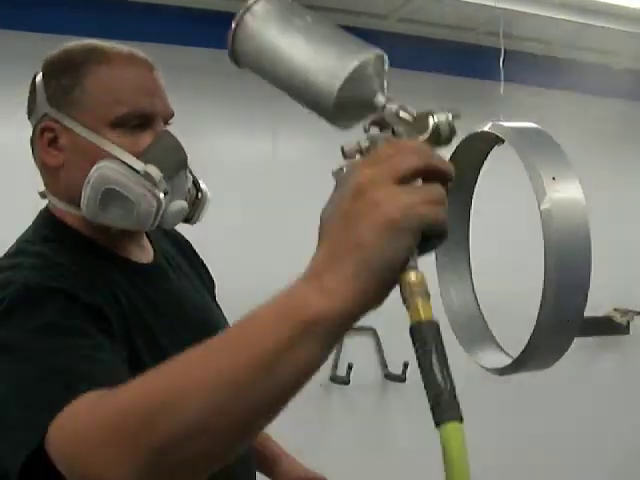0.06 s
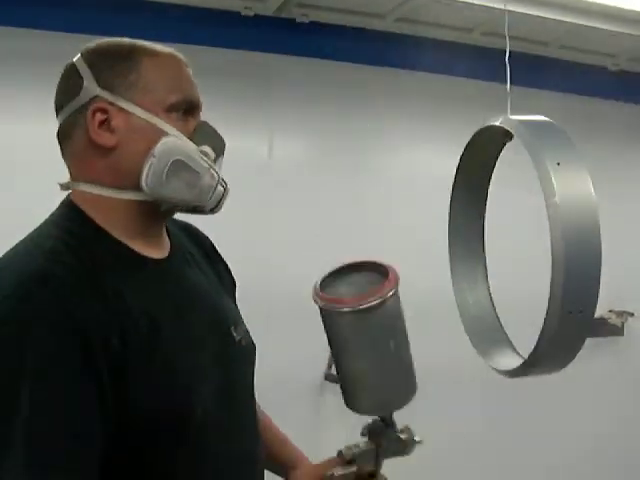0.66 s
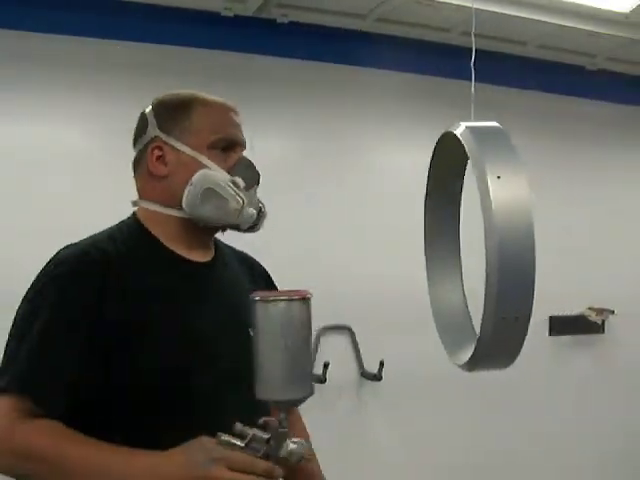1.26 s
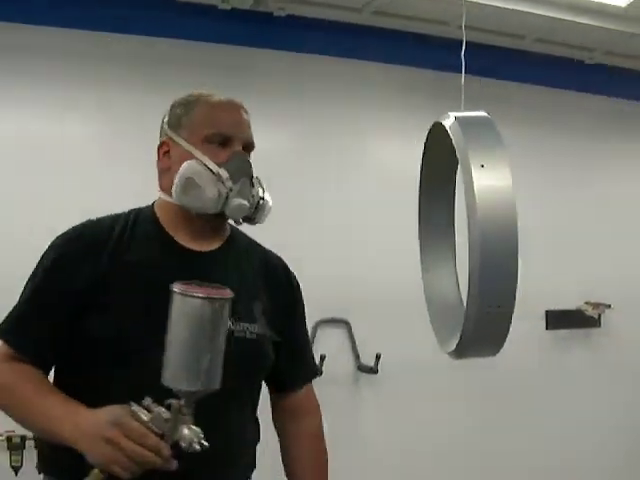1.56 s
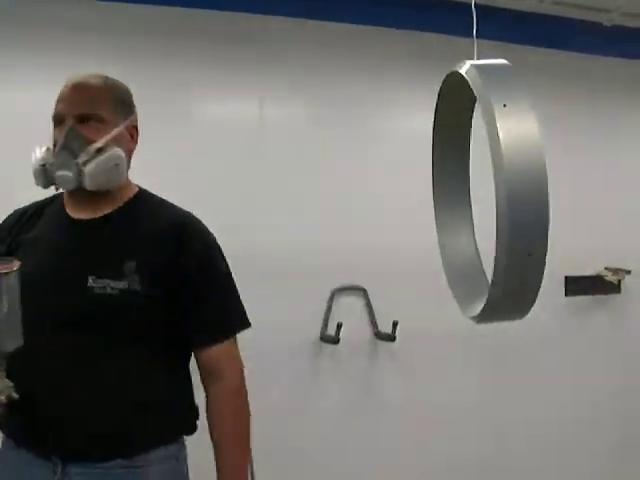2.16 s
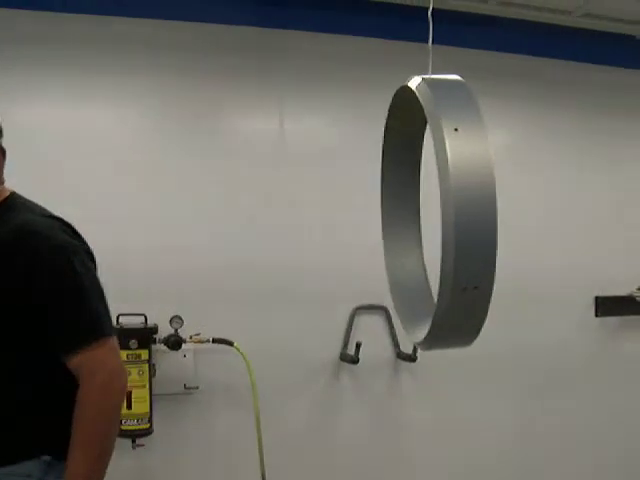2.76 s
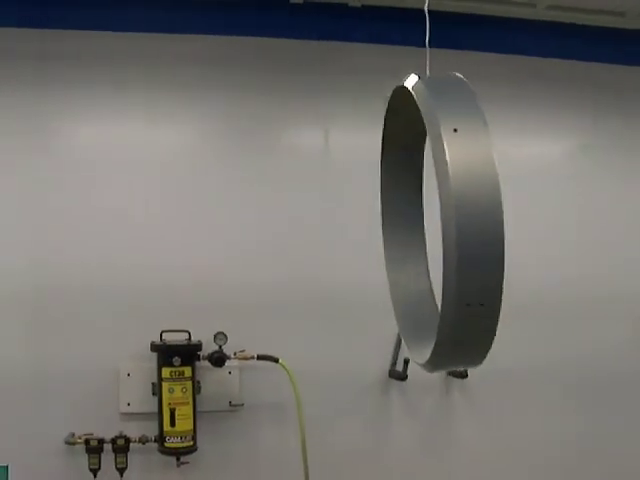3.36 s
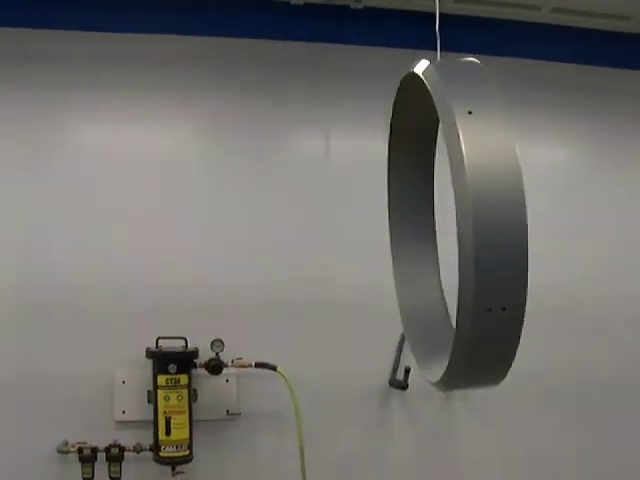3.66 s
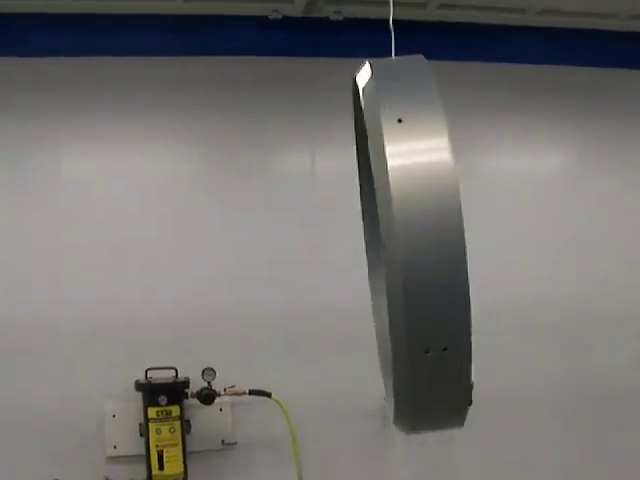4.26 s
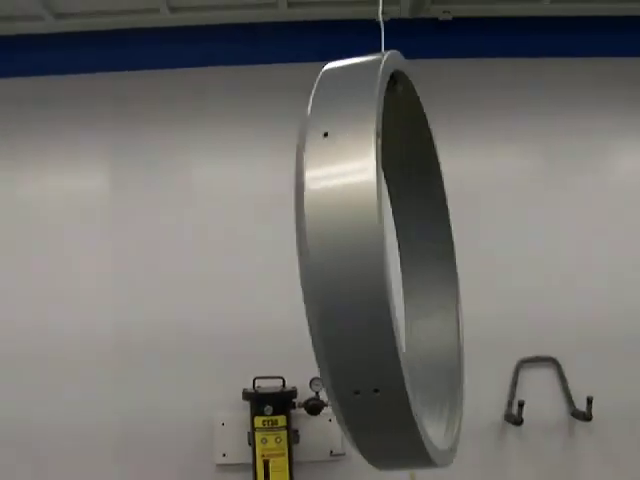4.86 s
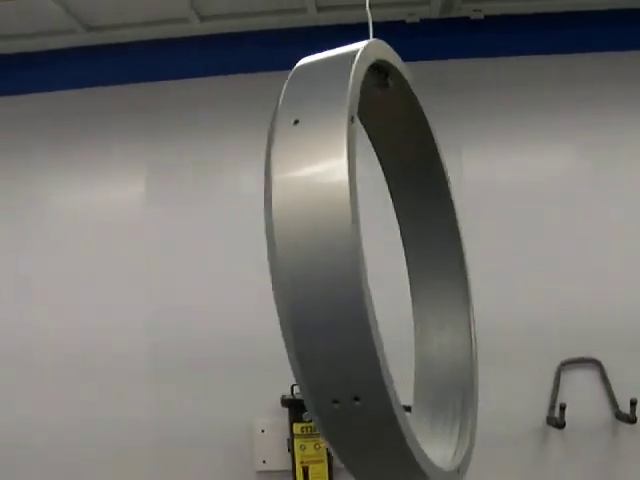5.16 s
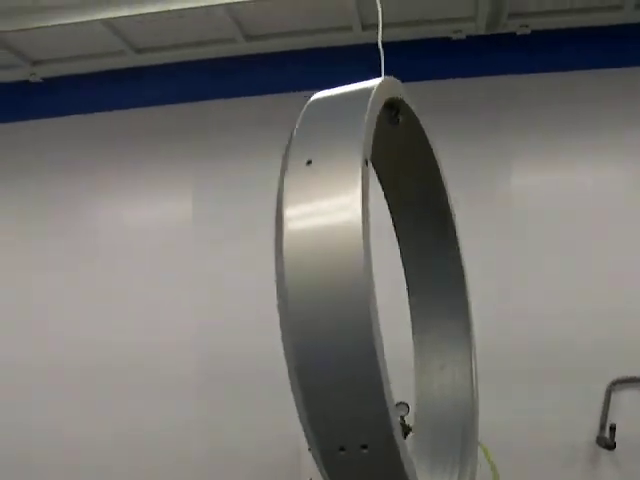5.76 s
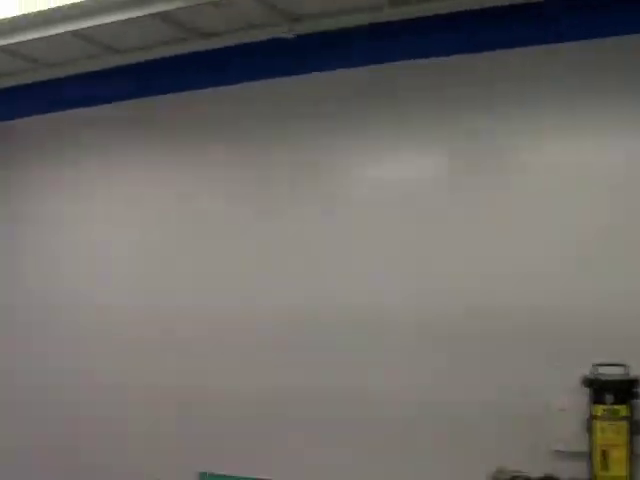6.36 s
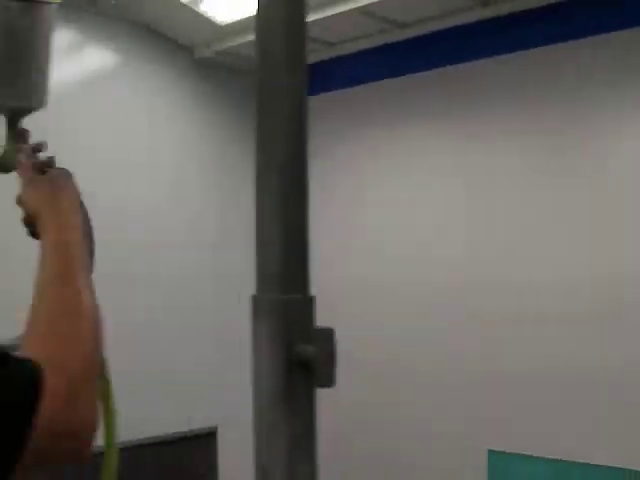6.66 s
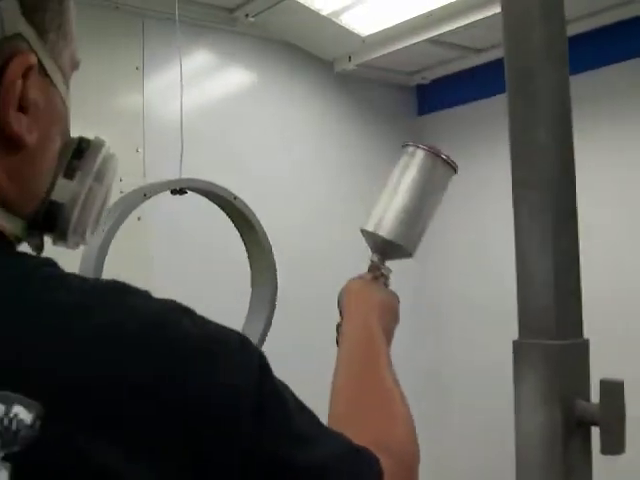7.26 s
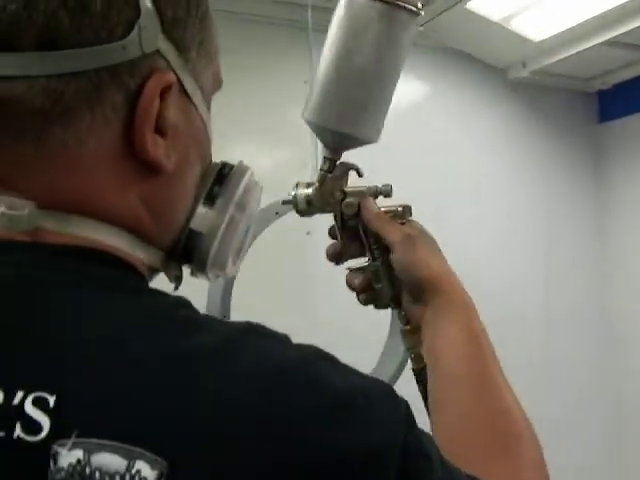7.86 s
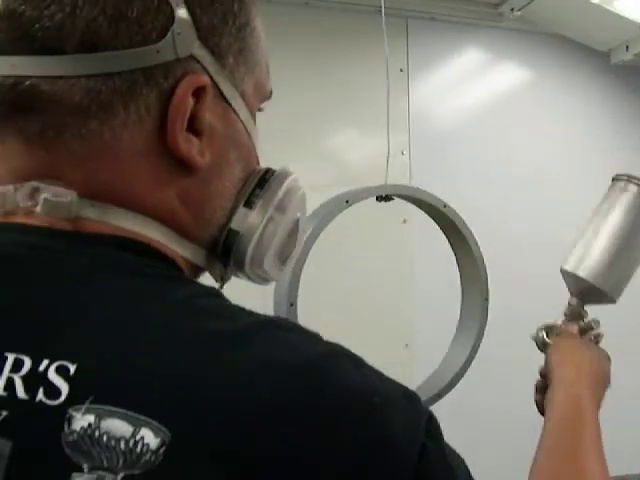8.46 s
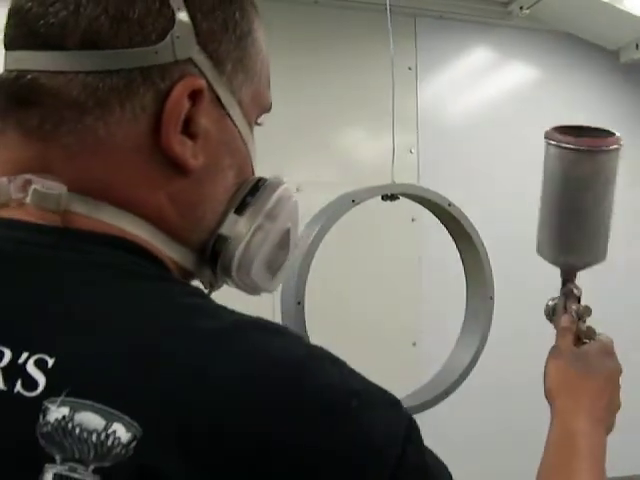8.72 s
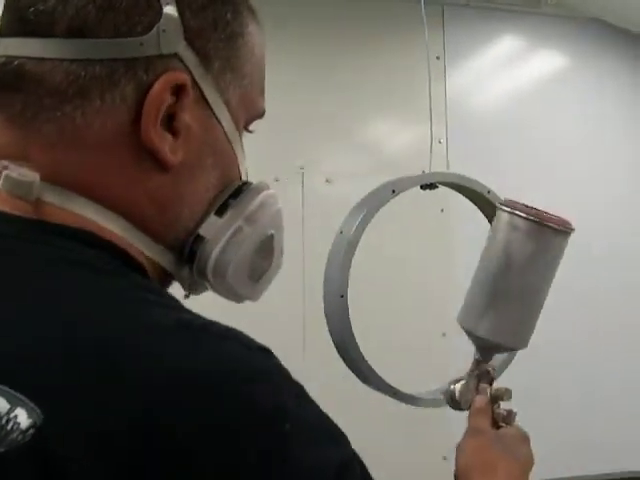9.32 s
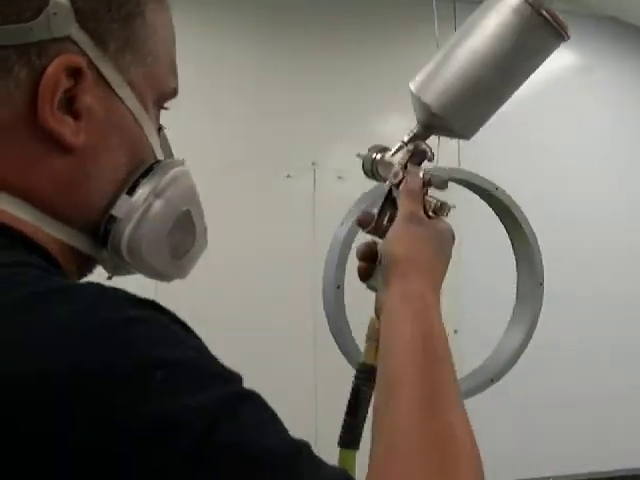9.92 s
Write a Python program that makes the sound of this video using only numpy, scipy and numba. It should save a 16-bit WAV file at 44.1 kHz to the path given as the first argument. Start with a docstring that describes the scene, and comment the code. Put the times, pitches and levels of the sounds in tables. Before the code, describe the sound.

In a paint booth, a compressed-air spray gun hisses brightly for under a second and stops. An extractor fan keeps droning, with a low duct rumble and rushing air that wavers slightly. After about five seconds the gun opens again and hisses to the end, swelling and easing as its aim moves. A small camera microphone picks it all up, overloading slightly.

```python
"""A paint booth. A compressed-air spray gun paints a hanging metal ring: one pass ends, a long one
follows after a pause. The jet hisses at the air cap and roars further out. The extractor fan drones
and rumbles through its ducts throughout; air rushes through the filters. A small camera hears it
through two resonant microphone ports, the left weak in the bass, and overloads slightly. Its gain
control lets the rush swell when the drone dips and ducks it when the drone peaks."""
import sys
import numpy as np
from scipy import signal
from scipy.fft import rfft, irfft
from scipy.io import wavfile
from scipy.ndimage import uniform_filter1d
from numba import njit

SR = 44100
rng = np.random.default_rng(int(sys.argv[2]) if len(sys.argv) > 2 else 0)


def unload_wav(signal):
    """Save mono or channel-first audio to the path in sys.argv[1] as 16-bit WAV at rate SR, clipped to [-1, 1]."""
    wavfile.write(
        sys.argv[1],
        SR,
        np.round(np.clip(np.atleast_2d(signal).T, -1, 1) * 32767).astype(np.int16),
    )


N = 440559
TIME_S = np.arange(N) / SR
FREQ_HZ = np.maximum(np.arange(N // 2 + 1) * SR / N, 1)

# Trigger pulls. Each row: press in seconds, release in seconds, strength in dB.
TRIGGER_PULLS = [(-0.2, 0.712, 2.2), (6.02, 10.2, 1.17)]
# Aim per pass. Each row: time in seconds, hiss gain in dB, roar gain in dB, leftward swing in dB.
FIRST_AIM = [(0, -13.0, -31.5, 1.5), (0.17, -11.5, -28.0, 4.5), (0.33, -13.5, -28.0, 0),
             (0.46, -15.5, -26.5, 1.5), (0.6, -17, -31, -1), (0.7, -16.5, -34.5, 3.5)]
LONG_AIM = [(6.1, -12, -32.5, 8.1), (6.22, -11.5, -32, 7.0), (6.36, -17, -34.0, 7.2),
            (6.55, -16, -33.0, 8.0), (6.75, -17.0, -32.0, 7), (7.1, -16.5, -30.5, 4.2),
            (7.25, -15.5, -35, 4), (7.45, -17, -32, 3.8), (7.7, -16, -31, 5.5), (7.85, -11.5, -28.5, 1.8),
            (8.0, -11, -27.5, 4.6), (8.2, -16, -30.5, 4.8), (8.43, -17.5, -33, 3.5), (8.62, -14, -33, 4.5),
            (9.05, -17.5, -31.0, 2.6), (9.5, -16, -30, 1.3), (9.75, -12.5, -29, 6),
            (9.99, -9.5, -28.5, 5.9)]
# Fine eddies at the cap, larger ones in the spray. Each row: frequency in Hz, relative density in dB.
HISS_SPECTRUM = [(1500, -26.5), (2800, -10.5), (4000, -3.5), (5000, 1), (6100, 3.5), (6900, 4), (7400, 2),
                 (8000, -3), (8600, -12.5)]
ROAR_SPECTRUM = [(400, -8.5), (1000, -5), (1500, -3.5), (2400, 4.5), (3300, 6.5), (4300, 2.5),
                 (6000, -30.5)]
# Puffs. Each row: centre in seconds, half length in seconds, level in dB.
PUFFS = [(4.186, 0.083, -48), (4.49, .03, -48.5)]
# Dulling of the puffs. Each row: frequency in Hz, gain in dB.
PUFF_TILT = [(4500, 5), (7500, -8)]

# Fan housing, duct and filter plenum modes. Each row: frequency in Hz, half width in Hz, gain in dB.
HOUSING_MODES = [(242, 9.5, -2), (253.5, 2.9, 3.5), (261.1, 9, -1), (288.7, 11.4, -0.5), (313.4, 17, -8)]
DUCT_BOOM_MODES = [(20.8, 10, -6), (45.7, 4.6, -3), (49.6, 2.8, 3), (97, 18, -15)]
DUCT_HUM_MODES = [(72.5, 3.6, 2), (79, 7.4, -10)]
PLENUM_MODES = [(161.2, 6.7, 2), (164, 33.5, -5), (193, 14, -7)]
# Blade-passing tone. Each row: harmonic number, level in dB against the housing noise.
BLADE_HZ, BLADE_LINES = 266.7, [(1, -8.5), (2, -25)]
# Extractor envelopes. Each row: time in seconds, relative level in dB.
DRONE_LEVEL = [(0, -15.5), (0.5, -16), (1.4, -14.0), (1.95, -16), (2.5, -13), (2.95, -17.0), (3.7, -15.5),
               (5.3, -14.5), (6.15, -14), (6.65, -13), (7.2, -15.5), (9.3, -15.5), (9.75, -13.5)]
BOOM_LEVEL = [(0, -26), (0.65, -20), (1.6, -26), (3.6, -22.5), (4.1, -20.5), (5.4, -22), (6.1, -19.5),
              (6.45, -30.5), (6.8, -22), (8.3, -23), (9.2, -21.0), (9.7, -27.5)]
HUM_LEVEL = [(0, -25.5), (0.4, -31.5), (1.4, -25.5), (2.4, -25.5), (2.9, -26.5), (3.5, -25.5), (5.5, -30.5),
             (6.5, -22), (7, -26), (8.8, -20), (9.6, -26.5)]
# Drone colour behind the ring. Each row: frequency in Hz, gain in dB.
BACK_DRONE_EQ = [(235, -2.5), (266, 2), (300, -1), (345, -4)]
# Drone dips, each ending in a peak. Each row: peak time in seconds, dip length in seconds, depth in dB.
DRONE_DIPS = [(1.365, 0.47, 1.5), (1.70, 0.036, 2), (2.069, .15, 3), (2.559, .2, 2.5), (2.72, .12, 0),
              (3.416, .17, 2.5), (3.625, 0.18, 0.5), (3.985, .2, 1.5), (4.264, 0.19, 2.5),
              (4.54, 0.25, 0.5), (4.796, .12, -0.5), (5.261, 0.24, 0.5), (5.575, 0.11, 1), (5.80, 0.25, 1)]

# Ventilation rush. Each row: frequency in Hz, relative density in dB.
RUSH_SPECTRUM = [(40, 1), (120, 2.5), (210, 5.5), (420, -0.5), (540, -1), (680, -4), (1000, -9.5),
                 (1450, -15.5), (1900, -16.5), (2500, -14), (3900, -27), (5100, -32.5), (6100, -31.5),
                 (8200, -51)]
# Booth modes before and behind the ring. Each row: frequency in Hz, half width in Hz, dB over the rush.
BOOTH_FRONT_MODES = [(361.5, 12, 6.5), (391, 12, 9.5), (464, 5.4, 1.5), (770, 7.4, 6.5), (860, 33, -1),
                     (4100, 47, 1.5)]
BOOTH_BACK_MODES = [(470, 15, -3), (529, 20, 3.5), (650, 15, -1.5), (1009, 12, 2.5)]
# Camera's walk round the ring. Each row: time in seconds, share of the back position from 0 to 1.
CAMERA_PATH = [(5.6, 0), (6.7, 0.99)]

# Likeness of the sound at the two ports. Each row: frequency in Hz, correlation.
PORT_CORRELATION = [(100, 1), (280, 0.98), (550, 1), (1000, 0.7), (2000, 0.44), (4000, 0.2)]
# Port cavities, left then right. Each row: resonance in Hz, bandwidth in Hz, gain in dB.
MIC_PORTS = [(6042, 750, -0.25), (5140, 570, 0.04)]
# Left capsule against right. Each row: frequency in Hz, gain in dB.
LEFT_CAPSULE_EQ = [(60, -11), (280, -8.5), (550, -7.0), (950, -5), (1550, -1.5), (2600, -3.5), (4500, 3),
                   (8000, 3)]
# Dip above 9 kHz that softens the clipping crackle. Each row: frequency in Hz, gain in dB.
CLIP_SOFTENING_EQ = [(8600, 0), (9200, -16), (11000, -9.5), (15000, -4)]


def spray_pass(pull, aim, hiss_db, roar_db, flutter_db, open_s=0.027, bleed_db_per_s=119, side_db=-4.5):
    """The valve feeds a jet that hisses at the cap and roars further out; aim moves level and side."""
    press_s, release_s, strength_db = pull
    aim_hiss_db, aim_roar_db, swing_db = curves(aim)
    opening = 1 - np.exp(-np.maximum(TIME_S - press_s, 0) / open_s)
    bleed = undb(-bleed_db_per_s * np.maximum(TIME_S - release_s, 0))
    hiss = undb(hiss_db + aim_hiss_db) * turbulence(undb(spectrum(HISS_SPECTRUM)))
    roar = undb(roar_db + aim_roar_db) * turbulence(undb(spectrum(ROAR_SPECTRUM)))
    pan = undb(np.outer([1, -1], side_db + swing_db) / 2)
    flutter = undb(flutter_db * (wander(25) + wander(160)))  # paint tears off the nozzle unevenly
    return opening * bleed * undb(strength_db) * flutter * (pan * hiss + roar)


def puffs():
    """Two faint, dull puffs of hiss between the passes."""
    swell = sum(undb(db) * np.exp(-((TIME_S - at_s) / half_s) ** 2) for at_s, half_s, db in PUFFS)
    return swell * turbulence(undb(spectrum(HISS_SPECTRUM) + spectrum(PUFF_TILT)))


def extractor(back_share, boom_db, hum_db, plenum_db, drone_db, back_plenum_db=-1.0):
    """Fan turbulence rings the ducts, plenum and housing; all dip and peak together."""
    boom = steady(turbulence(resonances(DUCT_BOOM_MODES)), window_samples=11000)
    boom *= undb(curves(BOOM_LEVEL)[0] + boom_db)
    hum = steady(turbulence(resonances(DUCT_HUM_MODES)), window_samples=9000)
    hum *= undb(curves(HUM_LEVEL)[0] + hum_db)
    plenum = steady(turbulence(resonances(PLENUM_MODES)), window_samples=13000)
    plenum *= undb(plenum_db + back_plenum_db * back_share)
    drone = fan_drone(back_share) * undb(curves(DRONE_LEVEL)[0] + drone_db)
    return (boom + hum + plenum + drone) * undb(dips_and_peaks_db())


def fan_drone(back_share):
    """Housing turbulence plus blade tone; behind the ring it gathers on the tone."""
    front = turbulence(resonances(HOUSING_MODES)) + blade_tone()
    back = colour(front, undb(spectrum(BACK_DRONE_EQ)))
    return steady((1 - back_share) * front + back_share * back, window_samples=9000)


def blade_tone(rate_spread=0.0037, swell_db=2.75):
    """Blades pass at a nearly steady rate; uneven inflow swells and fades each harmonic."""
    phase = 2 * np.pi * np.cumsum(BLADE_HZ * (1 + rate_spread * wander(12))) / SR
    return sum(undb(db + swell_db * wander(9)) * np.sqrt(2) * np.sin(k * phase) for k, db in BLADE_LINES)


def dips_and_peaks_db(peak_db=2.3, decay_s=0.035, edge_s=0.015):
    """Timed dips and peaks in the drone's level; via the gain control the rush swells and ducks."""
    def step(at_s):
        return np.clip((TIME_S - at_s) / edge_s + 0.5, 0, 1)

    level_db = np.zeros(N)
    for peak_s, dip_s, depth_db in DRONE_DIPS:
        dip = step(peak_s - dip_s) - step(peak_s)
        peak = step(peak_s) * np.exp(-np.abs(TIME_S - peak_s) / decay_s)
        level_db += peak_db * peak - depth_db * dip
    return level_db


def ventilation(back_share, front_db, back_db, flicker_db):
    """Air rushes through the filters; position sets which booth modes stand out."""
    air = undb(spectrum(RUSH_SPECTRUM))
    front = undb(front_db) * turbulence(air * np.hypot(1, resonances(BOOTH_FRONT_MODES)))
    back = undb(back_db) * turbulence(air * np.hypot(1, resonances(BOOTH_BACK_MODES)))
    rush = np.sqrt(1 - back_share) * front + np.sqrt(back_share) * back
    return rush * undb(flicker_db * wander(14))


def turbulence(gain):
    """Coloured stereo flow noise, rms 1: alike in the bass, diffuse in the treble."""
    correlation = np.clip(spectrum(PORT_CORRELATION), 0, 0.999)
    mid, side = rfft(rng.standard_normal((2, N))) * gain * np.sqrt([1 + correlation, 1 - correlation])
    return unit_rms(irfft([mid + side, mid - side], N))


def arrival(x, lag_ms):
    """Sound from one side reaches the right port later."""
    return np.array([x[0], colour(x[1], np.exp(-2j * np.pi * FREQ_HZ * lag_ms / 1000))])


@njit
def gain_control(peak, threshold, fall_db_per_s, rise_db_per_s, max_db):
    """Gain in dB: falls while the amplified peak is over threshold, else recovers."""
    gain_db, db = np.empty(len(peak)), 0.
    for i in range(len(peak)):
        if peak[i] * 10 ** (db / 20) > threshold:
            db -= fall_db_per_s / SR
        else:
            db = min(db + rise_db_per_s / SR, max_db)
        gain_db[i] = db
    return gain_db


def undb(db):
    """Decibels to gain."""
    return 10 ** (np.asarray(db) / 20)


def curves(table):
    """Each column of a timed table, linearly interpolated."""
    times_s, *columns = np.transpose(table)
    return [np.interp(TIME_S, times_s, column) for column in columns]


def spectrum(points):
    """Points joined on a log-frequency axis."""
    hz, value = np.transpose(points)
    return np.interp(np.log(FREQ_HZ), np.log(hz), value)


def resonances(modes):
    """Gain of steep-sided resonances whose powers add."""
    gains = (undb(db) / (1 + ((FREQ_HZ - hz) / half_hz) ** 2) for hz, half_hz, db in modes)
    return np.sqrt(sum(gain ** 2 for gain in gains))


def colour(x, gain):
    """Filter by a gain per frequency."""
    return irfft(rfft(x) * gain, N)


def unit_rms(x):
    """Scale to rms 1."""
    return x / np.sqrt(np.mean(x ** 2))


def steady(x, window_samples):
    """Hold windowed power near 1; quick beating stays."""
    return x / np.sqrt(uniform_filter1d(np.mean(x ** 2, axis=0), window_samples))


def wander(rate_hz):
    """Smooth random curve, rms 1, with new values at about rate_hz."""
    size = SR // rate_hz
    steps = np.repeat(rng.standard_normal(N // size + 1), size)
    return unit_rms(uniform_filter1d(steps, size)[:N])


def scene():
    """Two spray passes over the extractor and rushing air."""
    gun = sum(spray_pass(pull, aim, hiss_db=-11.0, roar_db=1.5, flutter_db=0.3)
              for pull, aim in zip(TRIGGER_PULLS, (FIRST_AIM, LONG_AIM)))
    back_share = curves(CAMERA_PATH)[0]
    fan = extractor(back_share, boom_db=6.5, hum_db=5.0, plenum_db=-18.5, drone_db=4.5)
    rush = ventilation(back_share, front_db=-21.5, back_db=-20.5, flicker_db=0.42)
    return gun + puffs() + arrival(fan + rush, lag_ms=0.19)


def record(dry):
    """Port cavities ring in the treble; the preamplifier hisses, band-limits, rides its gain and clips."""
    band_hz, top_hz = 8650, 16000
    sense_low_hz, sense_high_hz = 54.6, 5480
    ports = np.array([undb(db) / (1 - (FREQ_HZ / hz) ** 2 + 1j * FREQ_HZ * width_hz / hz ** 2)
                      for hz, width_hz, db in MIC_PORTS])
    capsules = np.array([undb(spectrum(LEFT_CAPSULE_EQ)), np.ones_like(FREQ_HZ)])
    self_noise = undb(-43.5) * turbulence(undb(spectrum([(7200, 6.0), (8200, -9), (8500, -28.0)])))
    heard = colour(dry, ports * capsules) + self_noise
    band = signal.sosfilt(signal.ellip(10, 0.2, 80, band_hz, fs=SR, output="sos"), heard)
    sensed = colour(band, 1 / np.hypot(1, FREQ_HZ / sense_high_hz) / np.hypot(1, sense_low_hz / FREQ_HZ))
    peak = np.abs(sensed).max(axis=0)
    gain_db = gain_control(peak, threshold=0.8, fall_db_per_s=1400.0, rise_db_per_s=19.5, max_db=1.5)
    ridden = band * undb(uniform_filter1d(gain_db, size=64))
    clipped = colour(np.clip(ridden, -1, 1), undb(spectrum(CLIP_SOFTENING_EQ)))
    return signal.sosfilt(signal.ellip(8, 0.2, 70, top_hz, fs=SR, output="sos"), clipped)


dry = scene()
out = record(dry)
unload_wav(out)
```